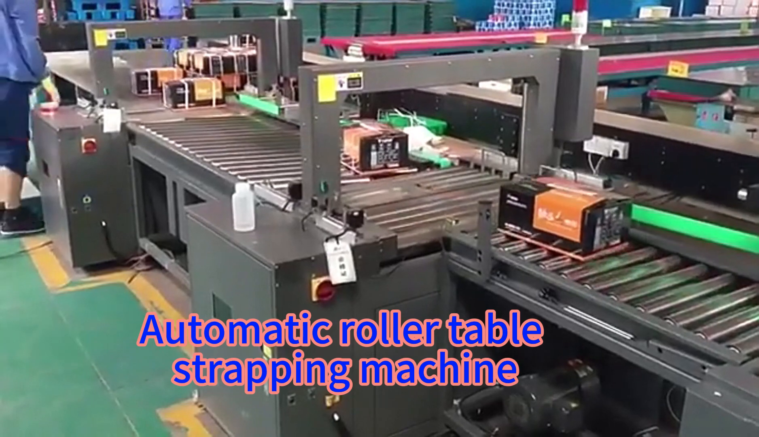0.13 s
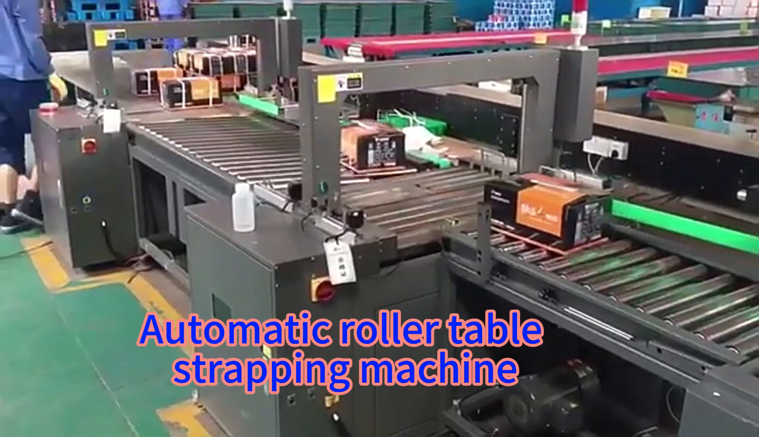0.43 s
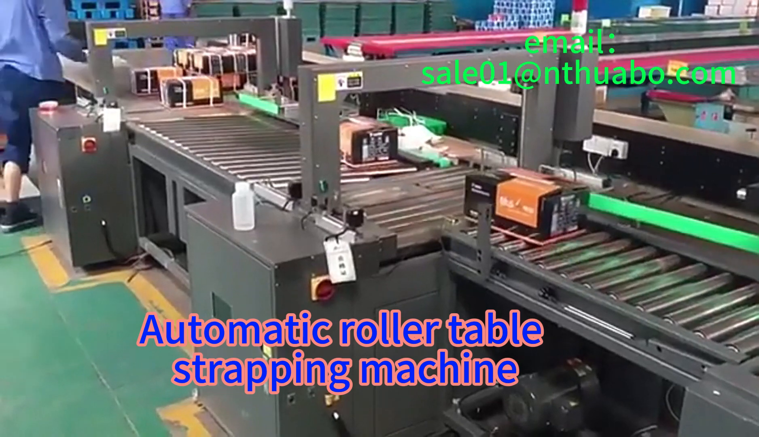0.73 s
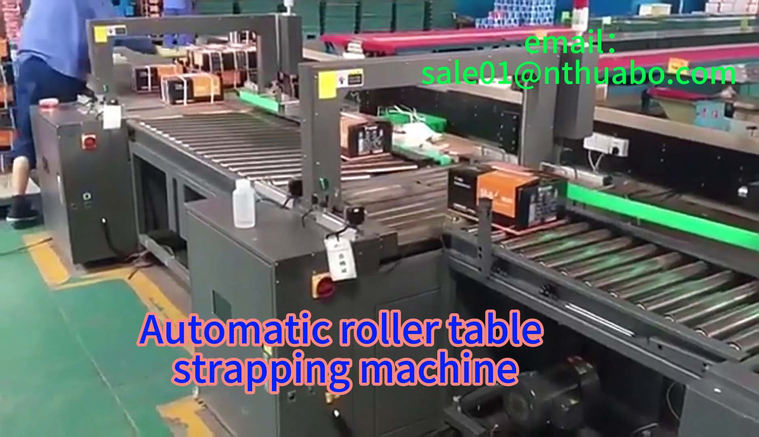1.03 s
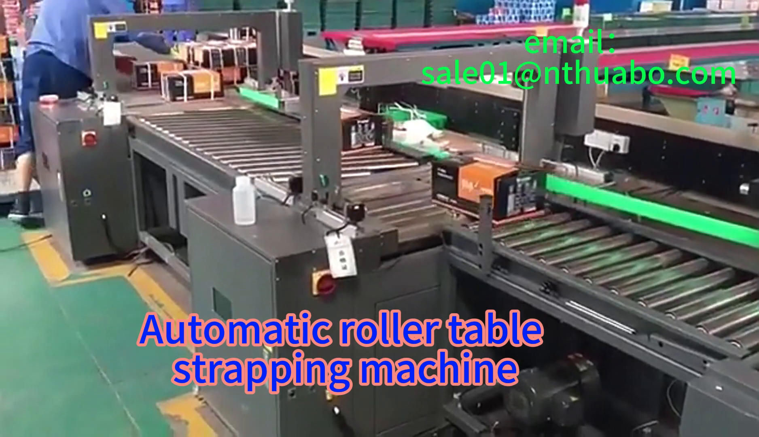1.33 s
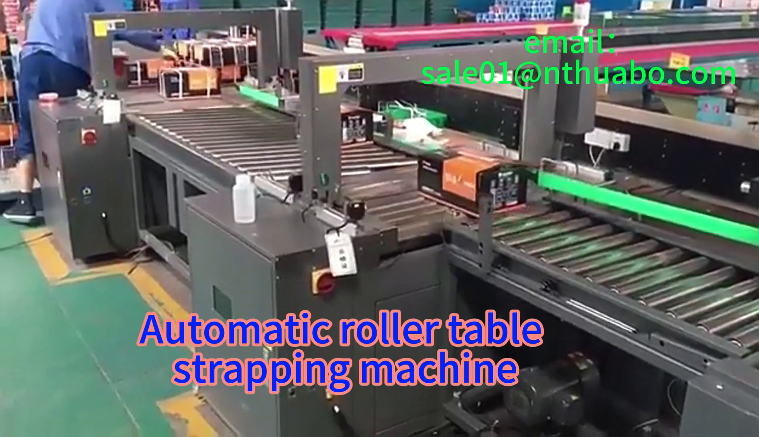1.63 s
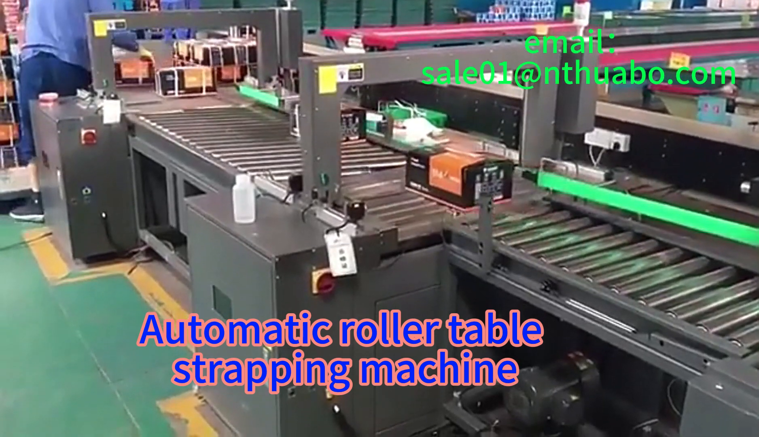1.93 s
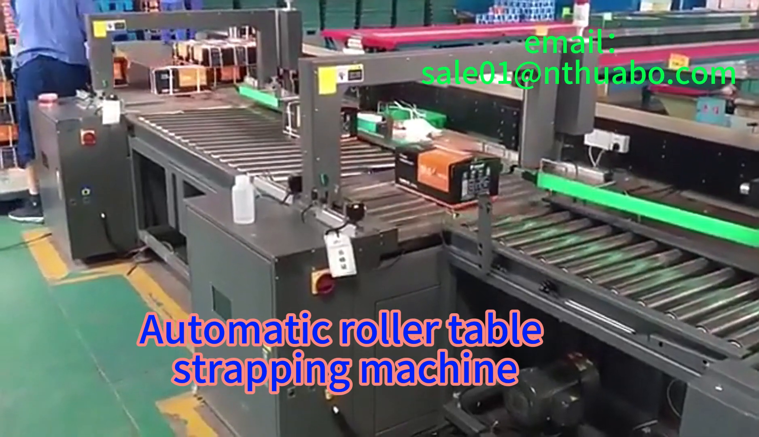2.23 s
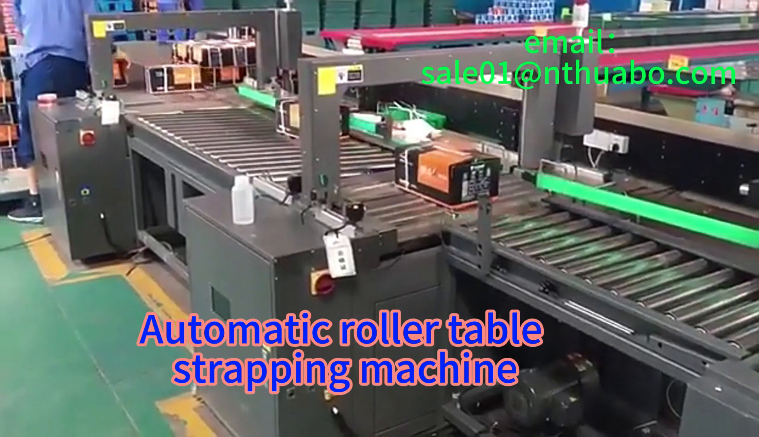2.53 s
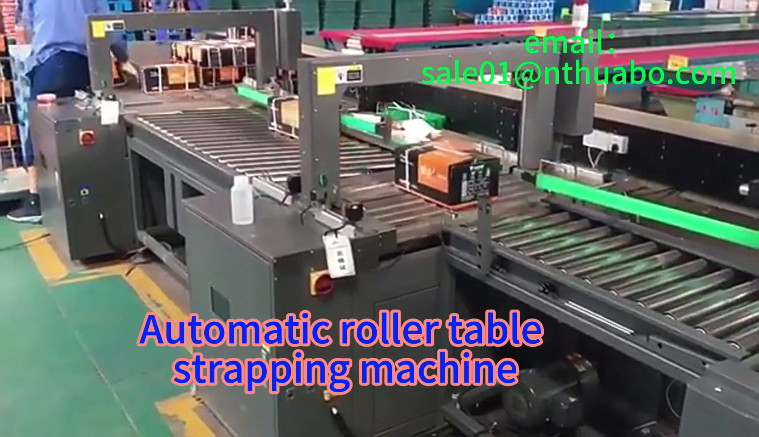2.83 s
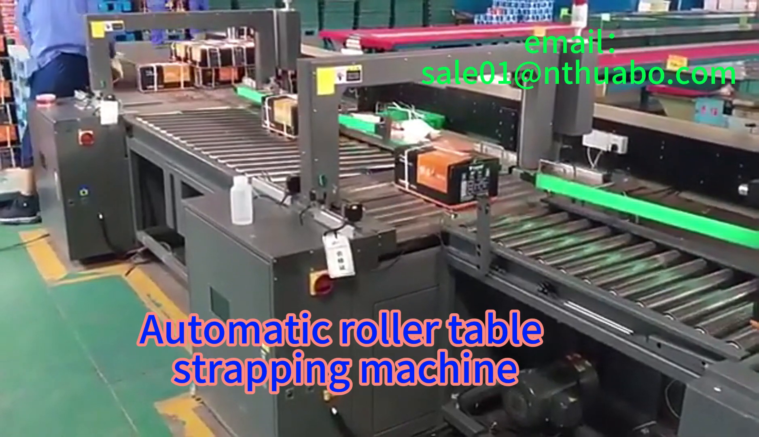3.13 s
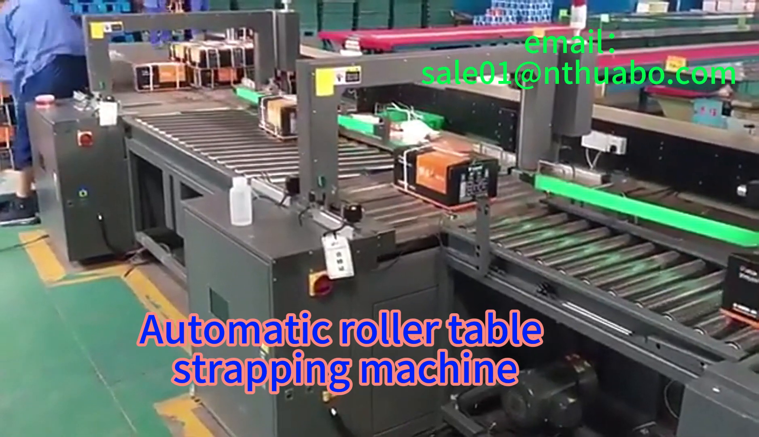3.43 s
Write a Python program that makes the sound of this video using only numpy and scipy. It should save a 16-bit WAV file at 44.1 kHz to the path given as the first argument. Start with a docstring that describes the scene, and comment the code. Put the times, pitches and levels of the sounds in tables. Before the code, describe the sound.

A strapping machine feeds strap with a bright scraping rush, snaps to a stop, then clacks in uneven groups with faint squeals, over rattling conveyor rollers, dull box thumps and low factory rumble.

```python
"""A strapping machine works beside a running roller conveyor in a factory hall.
Strap rushes through its guide arch, scraping and ringing at many small contacts, and then stops.
Grippers, cutter and press clack in turn: bursts of contacts that set the struck part and frame ringing.
Between clacks the strap squeals as it is drawn tight, a whistle mixed with resonant noise.
Throughout, filtered noise rumbles in the hall, rollers rattle, and boxes thump as damped low tones."""
import sys
import numpy as np
from scipy import signal
from scipy.fft import rfft, irfft
from scipy.io import wavfile
from scipy.ndimage import uniform_filter1d

SR = 44100
rng = np.random.default_rng(int(sys.argv[2]) if len(sys.argv) > 2 else 0)


def wrap_up_sound(samples):
    """Save the sound to the file named by the first command line argument, as 16-bit audio."""
    columns = np.atleast_2d(samples).T
    # keep every value between -1 and 1, then stretch to whole-number steps
    tamed = np.clip(columns, -1, 1)
    steps = np.round(tamed * 32767).astype(np.int16)
    wavfile.write(sys.argv[1], SR, steps)


N = 158319  # samples in the scene


def amp(db):
    """Level law: decibels to amplitude gain."""
    return 10 ** (np.asarray(db) / 20)


def unit(x):
    """Power normalisation: scales to rms 1."""
    return x / np.sqrt(np.mean(x ** 2) + 1e-20)


def read(points, hz):
    """Spectral interpolation: reads a table on a log-frequency axis."""
    f, value = np.transpose(points)
    return np.interp(np.log(hz + 1), np.log(f + 1), value)


def shaped(x, gain):
    """Linear filtering: multiplies the spectrum by gain(frequency), then scales to rms 1."""
    spectrum = rfft(x) * gain(np.fft.rfftfreq(len(x), 1 / SR))
    return unit(irfft(spectrum, len(x)))


def add(mix, start_s, sound):
    """Superposition: adds a sound into the mix at a time, cut to fit."""
    at = round(start_s * SR)
    sound = sound[max(-at, 0):]
    part = mix[max(at, 0):][:len(sound)]
    part += sound[:len(part)]


def impacts(size, rate, spread_db):
    """Shot noise: a random train of tiny impulses of either sign and uneven strength."""
    sign = rng.choice([-1., 1.], size)
    present = rng.random(size) < rate / SR
    return sign * present * amp(spread_db * np.minimum(rng.exponential(1, size), 4))


def blow(rise_s, fall_s):
    """Exponential growth and decay: time around a blow at t = 0, and its envelope."""
    t = np.arange(-SR // 10, SR // 3) / SR
    return t, np.exp(np.minimum(t / rise_s, -t / fall_s))


def resonate(x, hz, width_hz):
    """Tuned resonance: shifts the curve hz down to zero, low-passes, and shifts back."""
    turn = np.exp(2j * np.pi * np.cumsum(hz * np.ones(len(x))) / SR)
    r = np.exp(-np.pi * abs(width_hz) / SR)
    return 2 * (turn * signal.lfilter([1 - r], [1, -r], x / turn)).real


def clatter(rings_per_s, ring_s, scrape_db):
    """Sum of damped modes: many contacts ring, each at its own pitch, over a fine scrape; rms 1."""
    low_hz, high_hz, spread_db = 300, 7500, 3
    out, t = np.zeros(N), np.arange(SR // 12) / SR
    env = (1 - np.exp(-t / 0.0013)) * np.exp(-t / ring_s)
    scrape = unit(impacts(N, 6000, 2.2))  # impulses per s, spread in dB
    for when, pitch, size, phase in rng.random((20000, 4))[:int(rings_per_s * N / SR)]:
        hz = low_hz + pitch * (high_hz - low_hz)
        ring = np.sin((2 * np.pi * (hz * t + phase)).astype(np.float32))
        add(out, when * N / SR, amp(spread_db * min(-np.log(size), 3)) * env * ring)
    return unit(unit(out) + amp(scrape_db) * scrape)


def hall():
    """Broadband noise field: rumble of drives and wash of distant machines, in drifting patches."""
    # Spectral density of the hall noise: frequency_hz, relative_level_db (per Hz)
    hall_colour = [(20, -26.5), (37, -20.5), (49, 5), (62, -1.5), (100, -0.5), (125, 2.5), (165, -1.5),
                   (260, -10), (325, -5.5), (480, -16), (700, -16.5), (1000, -19), (1400, -26), (2000, -24),
                   (3000, -31.5), (5000, -32), (6000, -46.5), (7500, -54)]
    hall_db, patch_db, swell_db = -30, 1.2, 1
    frames, hz = N // 512 + 5, np.fft.rfftfreq(2048, 1 / SR)
    real, imaginary, patches = rng.standard_normal((3, frames, len(hz))).transpose(0, 2, 1)
    # Smooth the level drift over frequency, then over time
    patches = uniform_filter1d(patches, size=14, axis=0)
    patches = unit(uniform_filter1d(patches, size=7, axis=1))
    swell = unit(uniform_filter1d(rng.standard_normal(frames), size=6))
    level_db = read(hall_colour, hz)[:, None] + patch_db * patches + swell_db * swell
    noise = signal.istft((real + 1j * imaginary) * amp(level_db), nperseg=2048, noverlap=1536)[1]
    return amp(hall_db) * unit(noise[:N])


def room(x):
    """Diffuse reverberation: convolves with a random tail that decays at a rate set by frequency."""
    # Reverberation time of the hall: frequency_hz, t60_s
    decay = [(100, 0.31), (1000, 0.21), (4000, 0.38), (8000, 0.2)]
    hz, t, z = signal.stft(impacts(SR, 2000, 0), SR, nperseg=256)
    tail = signal.istft(z * amp(-60 * t / read(decay, hz)[:, None]), SR, nperseg=256)[1]
    return signal.fftconvolve(x, tail / np.linalg.norm(tail))[:N]


def thump(start_s, level_db, hz, fall_s):
    """Damped low mode: a box drops onto a roller and the conveyor bed booms, with a noisy knock."""
    rise_s, knock_db = 0.013, -9
    t, env = blow(rise_s, fall_s)
    knock = rng.standard_normal(len(t))
    for _ in range(2):
        knock = resonate(knock, hz * 1.26, hz)
    boom = np.sqrt(2) * np.sin(2 * np.pi * (hz * t + rng.random()))
    return start_s + t[0], amp(level_db) * env * (boom + amp(knock_db) * unit(knock))


def rollers():
    """Random impact excitation: loose rollers rattle in their bearings, with a few clearer ticks."""
    # Course of the rattle: time_s, relative_level_db
    rattle_level = [(0, -2), (.8, -0.5), (.88, 3), (1.04, -1), (1.12, 3.5), (1.19, -5), (1.26, 6),
                    (1.36, 5.5), (1.45, -0.5), (1.72, -5), (1.84, -3.5), (1.95, -2.5), (2.12, 1.5),
                    (2.3, -5), (2.47, -6), (2.6, -3.5), (2.7, -5), (2.86, -2.5), (2.98, -1), (3.06, -1.5),
                    (3.17, -9), (3.59, -1)]
    # Spectrum of the rattle: frequency_hz, relative_level_db
    rattle_colour = [(150, -5.5), (350, 5.5), (800, 1), (1800, -1), (3500, -7), (5000, -10.5), (5800, -10),
                     (7600, -18.5)]
    # Light ticks of the rollers: time_s, level_db
    ticks = [(0.122, -25), (0.289, -29), (0.908, -30), (0.939, -34), (0.996, -34), (1.115, -34),
             (1.768, -32), (1.84, -33.5), (2.527, -35.5), (2.765, -31.5), (2.79, -29.5), (2.876, -33),
             (2.905, -37.5), (3.11, -34.5), (3.196, -30.5), (3.268, -29.5)]
    knocks_per_s, spread_db, rattle_db = 130, 1.2, -36
    t, env = blow(0.0063, 0.039)
    knocks = signal.fftconvolve(impacts(N, knocks_per_s, spread_db) ** 2, env ** 2, "same")
    level_db = rattle_db + np.interp(np.arange(N) / SR, *np.transpose(rattle_level))
    power = amp(level_db) ** 2 * knocks / knocks.mean()
    tick_env = blow(0.012, 0.021)[1]
    for time_s, tick_db in ticks:
        add(power, time_s + t[0], (amp(tick_db) * tick_env) ** 2)
    contacts = clatter(rings_per_s=1900, ring_s=0.013, scrape_db=-4.5)
    return np.sqrt(abs(power)) * shaped(contacts, lambda f: amp(read(rattle_colour, f)))


def strap():
    """Sliding friction: plastic strap scrapes, clatters and flutters along its guide."""
    # Course of the strap running through the guide: time_s, level_db
    feed = [(0, -22.5), (.09, -32.5), (.13, -29.5), (.38, -29), (0.471, -25.5), (.54, -33), (0.609, -25),
            (.69, -31), (.76, -34), (.82, -56), (1.15, -59), (1.25, -47), (1.38, -43.5), (1.56, -36),
            (1.7, -49), (2.05, -47), (2.221, -33.5), (2.3, -38), (2.37, -47.5), (2.461, -43),
            (3.221, -44.5), (3.32, -38.5), (3.59, -32.5)]
    # Spectrum of the running strap: frequency_hz, relative_level_db
    feed_colour = [(200, -35), (500, -4.5), (1100, 5.5), (2100, 3), (3300, 0.5), (5000, -4), (5900, -2),
                   (6500, -2), (7600, -1)]
    flutter_db = 0.5
    contacts = clatter(rings_per_s=3000, ring_s=0.007, scrape_db=-1)
    scrape = shaped(contacts, lambda f: amp(read(feed_colour, f)))
    flutter = unit(uniform_filter1d(rng.standard_normal(N), size=600))
    level_db = np.interp(np.arange(N) / SR, *np.transpose(feed))
    return scrape * amp(level_db + flutter_db * flutter)


def squeal(start_s, length_s, from_hz, middle_hz, to_hz, level_db, rough, octave_db):
    """Frictional self-oscillation: the strap slips with an unsteady, gliding whistle and its octave."""
    jitter, jitter_s, width_hz, slip_db = 0.019, 0.005, 250, 3  # jitter is a fraction of the pitch
    size = round(length_s * SR)
    drift, slip = [unit(uniform_filter1d(z, size=round(jitter_s * SR)))[:size]
                   for z in rng.standard_normal((2, SR))]
    # A parabola through the three pitches
    curve = np.polyfit([0, .5, 1], [from_hz, middle_hz, to_hz], 2)
    hz = np.polyval(curve, np.linspace(0, 1, size)) * (1 + jitter * drift)
    noise = rng.standard_normal(size)

    def partial(k):
        """Power-weighted mixture: a tone and resonant noise at k times the pitch."""
        tone = unit(amp(slip_db * slip) * np.sin(2 * np.pi * k * np.cumsum(hz) / SR))
        fuzz = resonate(resonate(noise, k * hz, k * width_hz), k * hz, k * width_hz)
        return np.sqrt(1 - rough) * tone + np.sqrt(rough) * unit(fuzz)

    whistle = partial(1) + amp(octave_db) * partial(2)
    return start_s, amp(level_db) * signal.windows.tukey(size, .3) * whistle


def clack(start_s, low_db, mid_db, treble_db, rise_s, fall_s, *rings):
    """Impact excitation of modes: contacts chatter around a hard strike; part and frame ring on."""
    # Spectrum of the contact burst: frequency_hz, relative_level_db
    clack_colour = [(100, -14), (200, 0.5), (300, -0.5), (600, 0), (900, 3.5), (1900, 4), (2600, -3),
                    (4000, -8.5), (5000, -15), (5800, -15.5), (7600, -19.5)]
    # Modes of the steel frame: nominal_hz, relative_level_db, t60_s
    frame_modes = [(300, -9, 0.31), (403, 4.5, 0.2), (756, -3, 0.11), (903, -1, 0.42), (1280, -5, 0.14),
                   (1607, -1, 0.35), (1860, -1.5, 0.27), (3270, -1.5, 0.28)]
    low_edge_hz, treble_edge_hz = 840, 3570
    strike_db, frame_db = -21.5, -13.5
    ring_rise_s, ring_fall_s = 0.0033, 0.0045
    t, env = blow(rise_s, fall_s)
    hits = unit(impacts(len(t), 6000, 2.5))  # contacts per s, spread in dB
    hits[np.argmax(env)] += amp(strike_db) * np.sqrt(SR * fall_s / 2)

    def low(f):
        return 1 / (1 + (f / low_edge_hz) ** 6)

    def treble(f):
        return 1 - 1 / (1 + (f / treble_edge_hz) ** 6)

    def middle(f):
        return 1 - low(f) - treble(f)

    def mode(hz, tau_s):
        ring_env = blow(min(rise_s, ring_rise_s), tau_s)[1]
        return np.sqrt(2) * ring_env * np.sin(2 * np.pi * (hz * t + rng.random()))

    burst = 0
    for db, band in ((low_db, low), (mid_db, middle), (treble_db, treble)):
        burst += amp(db) * shaped(hits, lambda f: band(f) * amp(read(clack_colour, f)))
    frame = 0
    for hz, db, t60_s in frame_modes:
        # Each blow excites the modes unevenly and slightly off their nominal pitch
        strength, detune = rng.uniform(0.46, 1), rng.uniform(0.95, 1.04)
        frame += amp(db) * strength * mode(hz * detune, t60_s / np.log(1000))
    part = 0
    for hz, db in zip(rings[::2], rings[1::2]):
        part += amp(db) * mode(hz, np.sqrt(ring_fall_s * fall_s))
    return start_s + t[0], env * burst + amp(mid_db + frame_db) * frame + part


def scene():
    """Superposition of sources: machine and rollers with their reverberation, thumps and hall noise."""
    # Boxes bumping over the rollers: start_s, level_db, pitch_hz, fall_s
    thumps = [(0.043, -19.5, 84, 0.012), (0.215, -28.5, 111, 0.049), (0.795, -30.5, 306, 0.011),
              (0.842, -24, 153.5, 0.026), (0.871, -21, 129.4, 0.022), (0.881, -29, 317, 0.031),
              (0.913, -26, 171, 0.046), (0.992, -27, 127, 0.027), (1.117, -28, 124.5, 0.022),
              (1.41, -29.5, 124, 0.014), (1.479, -21.5, 113, 0.0075), (1.62, -21, 112, 0.011),
              (1.783, -22.5, 96.6, .05), (2.191, -27.5, 176, 0.019), (2.355, -25, 90.6, 0.015),
              (3.358, -30.5, 91, 0.011), (3.4, -27, 125, 0.019)]
    # Strap slipping on the tension wheel: start_s, length_s, from_hz, middle_hz, to_hz, level_db,
    # rough (noise share of power, 0-1), octave_db (relative to the whistle)
    squeals = [(1.402, 0.23, 3640, 3485, 3060, -41, .75, -23), (1.66, 0.05, 3800, 3650, 3470, -42, .6, -20),
               (2.259, 0.115, 3360, 3495, 3467, -36, 0.8, -2),
               (3.467, 0.083, 4000, 3840, 3560, -40, .8, -20)]
    # Clacks of the mechanism: start_s, low_db, mid_db, treble_db, rise_s, fall_s,
    # then three rings of the struck part, each pitch_hz, level_db
    clacks = [(0.036, -34.5, -34, -30.5, 0.079, 0.019, 1127, -39, 1670, -41, 3600, -45),
              (0.4836, -25.5, -21.5, -19, 0.0008, 0.0015, 2460, -19.5, 2850, -24, 2150, -20),
              (0.491, -34, -23.5, -18, .001, 0.0033, 2300, -23, 1060, -23, 5800, -23.5),
              (0.501, -40, -29.5, -23.5, .004, .013, 2580, -26, 1854, -26, 4080, -30),
              (0.699, -40, -27, -22, 0.011, 0.01, 2030, -23.5, 5850, -27, 6150, -30),
              (1.281, -29, -25, -26.5, 0.0017, 0.02, 401, -22, 1575, -28, 3380, -26.5),
              (1.303, -41, -33, -34, 0.006, 0.067, 718, -28, 999, -27.5, 2660, -32.5),
              (1.5803, -30, -25.5, -25, 0.003, 0.0056, 1890, -22, 2680, -26, 740, -24),
              (1.5895, -30, -38, -31, 0.0011, 0.033, 725, -24, 1630, -26.5, 320, -29),
              (2.005, -25, -24, -29, 0.0087, 0.027, 829, -23.5, 1280, -27, 738, -25.5),
              (2.115, -35, -34.5, -54, 0.029, 0.03, 800, -47, 1394, -31, 2300, -36),
              (2.187, -30.5, -23.5, -26.5, 0.013, 0.02, 1470, -27, 890, -24.5, 4100, -34),
              (2.211, -34, -28.5, -38, 0.01, 0.016, 1934, -22.5, 1170, -36, 372, -27),
              (2.243, -31, -37, -38, 0.0092, 0.016, 900, -35, 1800, -37, 348, -29),
              (2.372, -30, -30, -24.5, 0.014, 0.0054, 1280, -29, 3400, -37, 5500, -24),
              (2.385, -33, -28.5, -22, 0.011, 0.018, 1410, -27, 5400, -29, 3990, -33),
              (3.297, -30, -26.5, -23.5, 0.01, 0.0043, 3700, -25.5, 4300, -32, 1450, -29),
              (3.304, -27.5, -21, -21, 0.0094, 0.02, 290, -19.5, 1870, -22.5, 510, -24.5),
              (3.337, -31.5, -31.5, -38, 0.0093, 0.047, 1254, -27, 1325, -31, 720, -46),
              (3.395, -25, -30, -19.5, 0.012, 0.0073, 946, -21.5, 3910, -22, 5650, -30),
              (3.403, -34, -34, -26.5, 0.0024, 0.022, 854, -27, 3140, -31, 5717, -31),
              (3.575, -27.5, -28.5, -20.5, 0.012, 0.022, 3976, -21, 2760, -24, 4350, -26)]
    room_db = -13
    machine, bed = strap() + rollers(), np.zeros(N)
    for row in thumps:
        add(bed, *thump(*row))
    for row in squeals:
        add(machine, *squeal(*row))
    for row in clacks:
        add(machine, *clack(*row))
    return (machine + amp(room_db) * room(machine) + bed + hall())[None]


def record(dry):
    """Band limitation: a linear-phase low-pass removes the highest treble."""
    edge_hz = 7590
    lowpass = signal.firwin(1201, edge_hz, window=("kaiser", 9), fs=SR)
    return signal.oaconvolve(dry, lowpass[None], "same")


dry = scene()
out = record(dry)
wrap_up_sound(out)
```